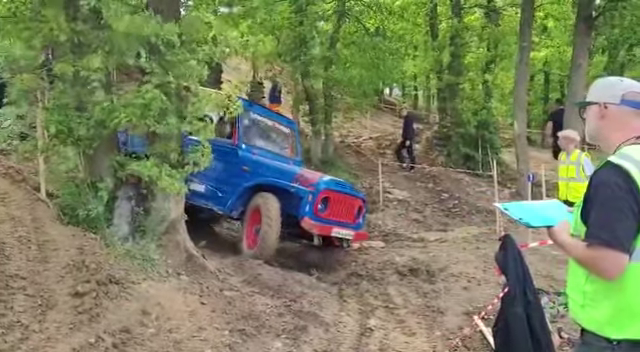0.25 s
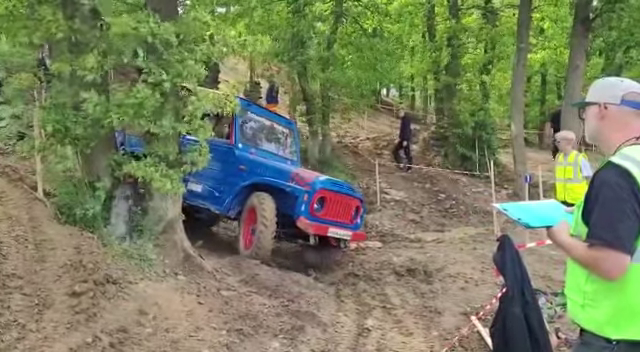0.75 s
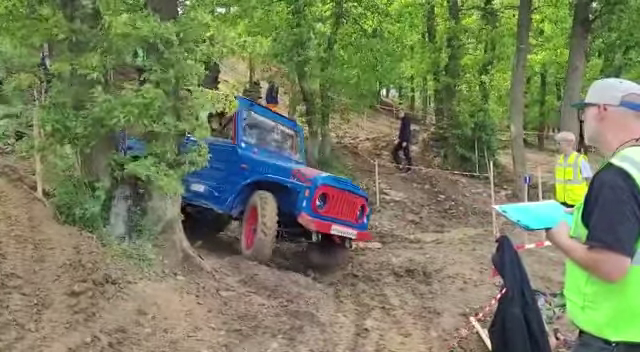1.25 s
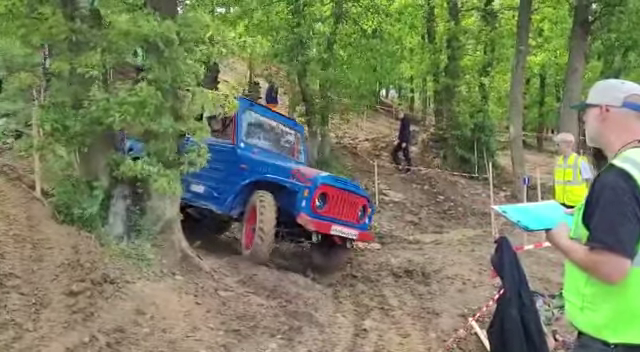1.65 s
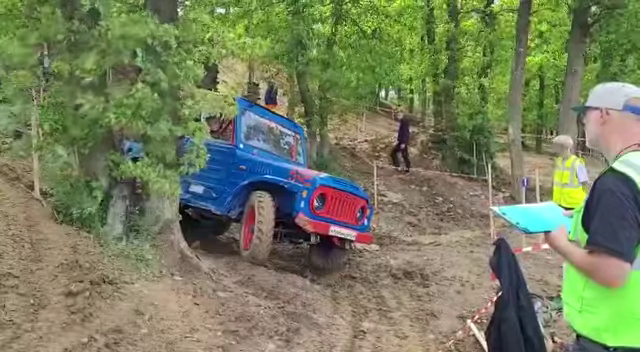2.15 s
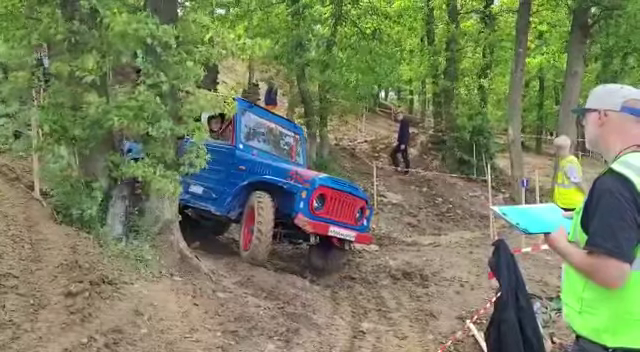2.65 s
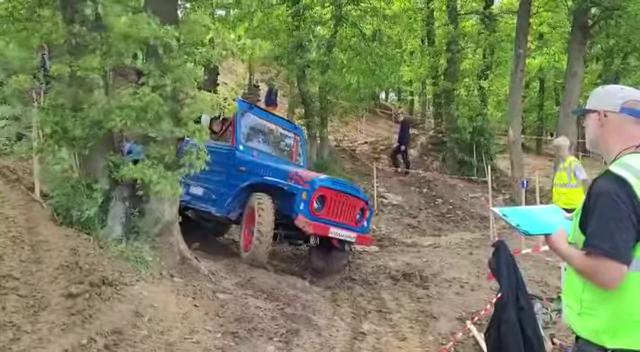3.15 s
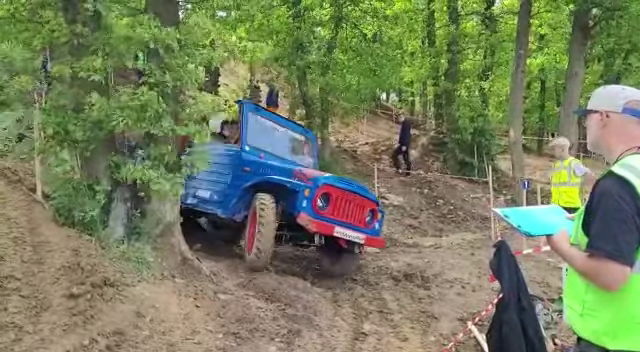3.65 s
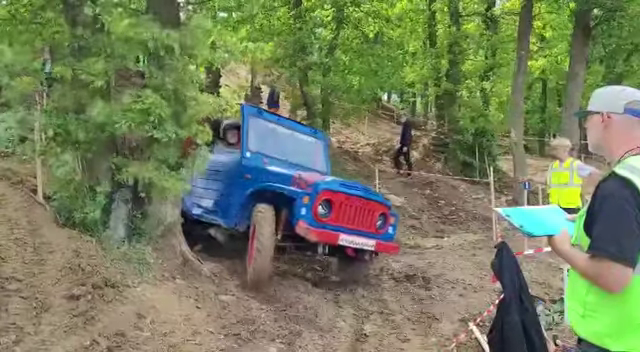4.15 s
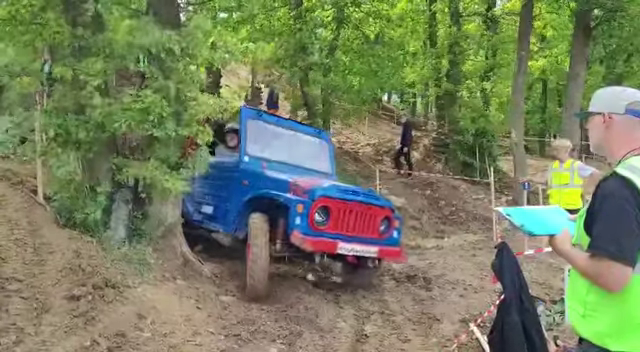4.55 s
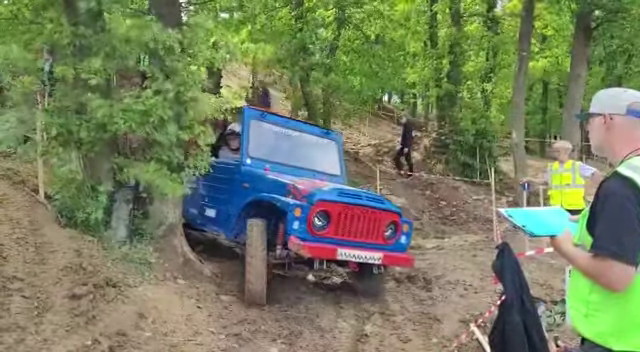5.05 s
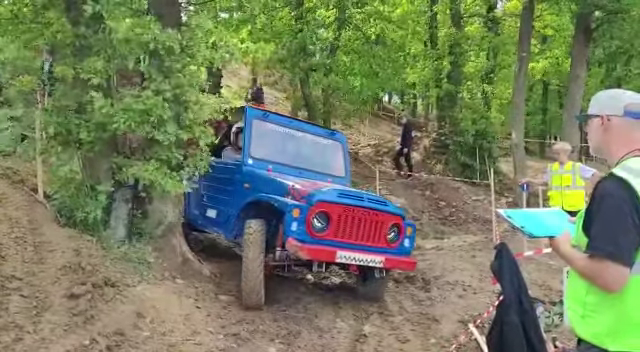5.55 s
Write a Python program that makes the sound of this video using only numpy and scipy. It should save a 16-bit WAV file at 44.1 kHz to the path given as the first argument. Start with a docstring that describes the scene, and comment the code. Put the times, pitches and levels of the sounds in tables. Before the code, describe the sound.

Outdoors in a wood, a few metres from a stereo microphone, a small four-cylinder engine growls on brief throttle stabs, with boomy exhaust and spitting hiss. The revs sag between stabs into clatter, fan air and rattling panels. A tiny chirp comes midway, and distant engines drone.

```python
"""A small four-cylinder off-roader crawls over a dirt bank in a wood, a few metres from a stereo microphone.
On short stabs of the throttle its exhaust booms in low harmonics of the firing rate, barks as each firing
kicks a pipe resonance, and spits shaped noise as hiss; between stabs the revs run down.
Clatter, fan air and rumble are coloured noise, and loose panels ring with random taps. Grit crackles under
the tyres, a spring bush chirps once, the trees echo the bark, and other engines drone farther off as tones."""
import sys
import numpy as np
from scipy import signal
from scipy.fft import rfft, irfft, next_fast_len
from scipy.io import wavfile
from scipy.ndimage import uniform_filter1d, map_coordinates

SR = 44100
rng = np.random.default_rng(int(sys.argv[2]) if len(sys.argv) > 2 else 0)


def put_to_file(sound):
    """Save the sound as 16-bit audio at rate SR, in the file named by the first command-line argument."""
    columns = np.atleast_2d(sound).T  # one column per channel
    safe = np.clip(columns, -1, 1)
    whole_steps = np.round(safe * 32767)
    wavfile.write(sys.argv[1], SR, whole_steps.astype(np.int16))


N = 255780


def amp(db):
    """Decibels to gain."""
    return 10 ** (np.asarray(db) / 20)


def unit(x):
    """Scale to rms 1."""
    return x / np.sqrt(np.mean(x ** 2) + 1e-20)


def along(points, hz):
    """Read (Hz, value) points on a log frequency axis."""
    f, v = np.transpose(points)
    return np.interp(np.log(hz + 1), np.log(f + 1), v)


def curves(rows):
    """One value per sample for each column after the time."""
    s, *cols = np.transpose(rows)
    t = np.arange(N) / SR
    return [np.interp(t, s, c) for c in cols]


def wobble(rate):
    """A smooth random curve through rate knots a second."""
    knots = rng.standard_normal(N // 40)
    return map_coordinates(knots, [np.arange(N) * rate / SR], mode="wrap")


def filtered(x, response):
    """Pass x through a complex response of frequency."""
    m = next_fast_len(N + SR // 2)
    spectrum = rfft(x, m) * response(np.fft.rfftfreq(m, 1 / SR))
    return irfft(spectrum, m)[..., :N]


def resonances(modes):
    """Causal response of (Hz, width Hz, dB) modes, summed with alternating sign."""
    def response(f):
        total = 0
        for k, (centre, width, db) in enumerate(modes):
            mode = 1j * f * width / (centre * centre - f * f + 1j * f * width)
            total = total + (-1) ** k * amp(db) * mode
        return total
    return response


# how alike the two microphone channels are: pitch_hz, likeness (1 same, 0 unrelated, negative opposed)
LIKENESS = [(25, 0.7), (70, 0.51), (500, 0.92), (1000, 0.71), (2000, 0.57), (4000, 0.3), (8000, 0.16),
            (14000, -0.25)]


def spread(pair):
    """Two unrelated signals become left and right: most alike near 500 Hz, apart in the treble."""
    def mid_side(hz):
        turn = np.arccos(np.clip(along(LIKENESS, hz), -1, 1)) / 2
        return np.array([np.cos(turn), np.sin(turn)])
    mid, side = filtered(pair, mid_side)
    return unit(np.array([mid + side, mid - side]))


def rush(spectrum, gate=1):
    """Turbulent stereo noise of rms 1, chopped by a gate and then coloured."""
    chopped = gate * rng.standard_normal((2, N))
    return spread(filtered(chopped, lambda hz: amp(along(spectrum, hz))))


def puffs(cycles, decay, scatter_db):
    """An envelope that jumps once a cycle to a new height and dies away within it (decay in cycles)."""
    sizes = amp(scatter_db * rng.standard_normal(N // 100))
    return unit(sizes[cycles.astype(int)] * np.exp(-(cycles % 1) / decay))


# stabs of the throttle: start_s, length_s, climb_s, pulling_hz, flare_hz, flare_length_s, settling_hz,
# first_spit_s, then relative boom_db, overtone_db, bark_db, hiss_db
THROTTLE_STABS = [(-.045, 0.29, .11, 83.55, 103.9, .2, 86.93, .029, -17, -23, -27, -50),
                  (.73, 0.058, 0.0504, 84.45, 87.21, 0.02005, 87.23, .77, -45, -41, -57, -70),
                  (.874, .255, .07, 103.1, 102.9, .08, 84.32, .908, -12.5, -19, -24.5, -48.5),
                  (2.76, 0.13, 0.097, 72.77, 76.2, 0.058, 74.92, 2.808, -20.5, -30.5, -38.5, -58.5),
                  (3.168, .32, .118, 87.16, 94.5, .08, 75.65, 3.194, -14.5, -19.5, -22, -50),
                  (3.94, 0.12, 0.099, 86.3, 90.7, 0.053, 82.24, 3.96, -25.5, -33.5, -35.5, -55.5)]
OVERRUN_S = .052  # the revs peak just after the throttle shuts
WHEEL_HZ, DRAG_S = 80.84, .23  # the slipping clutch drags the firing rate toward that of the wheels
RUN_DOWN_HZ_PER_S, SETTLE_HZ_PER_S = 64, 12.2  # off the throttle the revs fall fast, then slowly
FLYWHEEL_S = 0.045  # the flywheel rounds off every change of speed
HUNT_HZ, HUNTS_PER_S = .5, 12  # the speed is never quite steady


def revs():
    """Firing rate: a stab lifts it, the clutch drags on it, it flares as the clutch opens, then runs down."""
    t = np.arange(N) / SR
    hz = np.full(N, float(THROTTLE_STABS[0][3]))
    for start, length, climb_s, pull_hz, flare_hz, flare_s, settle_hz, *_ in THROTTLE_STABS:
        grip, peak = start + climb_s, start + length + OVERRUN_S
        free = max(peak - flare_s, grip)
        dragged_hz = WHEEL_HZ + (pull_hz - WHEEL_HZ) * np.exp((grip - free) / DRAG_S)
        start_hz = np.interp(start, t, hz)
        driven = np.interp(t, [start, grip, free, peak], [start_hz, pull_hz, dragged_hz, flare_hz])
        run_down = flare_hz - RUN_DOWN_HZ_PER_S * (t - peak)
        settling = settle_hz - SETTLE_HZ_PER_S * (t - peak)
        hz = np.select([t < start, t < peak], [hz, driven], np.maximum(run_down, settling))
    return uniform_filter1d(hz, int(FLYWHEEL_S * SR)) + HUNT_HZ * wobble(HUNTS_PER_S)


FADE_DB_PER_S, LINGER_S = 12.5, 0.18  # a held stab fades; a little of it may linger on the overrun


def throttle(part, attack_s, release_s, lead_s=0, early_s=0, snap_db=-120, linger_db=-120):
    """Gain the stabs give a part: attack, fading hold, release, perhaps a snap and a lingering tail."""
    t, gain = np.arange(N) / SR, np.zeros(N)
    for start, length, *_, boom_db, overtone_db, bark_db, hiss_db in THROTTLE_STABS:
        db = dict(boom=boom_db, overtones=overtone_db, bark=bark_db, hiss=hiss_db)[part]
        age = t - start
        shut = np.maximum(age - length + early_s, 0)
        opening = np.sin(np.pi / 2 * np.clip((age + lead_s) / attack_s, 0, 1)) ** 2
        tail = amp(linger_db) * np.exp(-shut / LINGER_S)
        closing = np.maximum(np.exp(-shut / release_s), tail)
        snap = amp(snap_db) * np.exp(-np.abs(age - length) / 0.059)  # as the throttle shuts
        fading = amp(db - FADE_DB_PER_S * np.clip(age, 0, length))
        gain += fading * (opening * closing + snap)
    return gain


# the grille swings toward the microphone: time_s, front_gain_db (each part takes its own share)
FACING_GAIN = [(0, 1.5), (2.4, -0.5), (3.8, 4), (4.4, 3), (5.35, 9.5), (5.8, 9)]
CRUISE_HZ = 80  # reference firing rate


def running(law, hz):
    """Gain of a part off the throttle: it follows the revs and the turn of the front."""
    db, db_per_octave, front_share = law
    octaves = np.log2(hz / CRUISE_HZ)
    return amp(db + db_per_octave * octaves + front_share * curves(FACING_GAIN)[0])


BARK_LEAD = .5  # the bark comes this many firings before the spit


def cylinder_count(firings):
    """Firings counted from the first spit of the latest stab: every fourth spits, just after its bark."""
    t, count = np.arange(N) / SR, firings
    for start, *_, first_spit, boom_db, overtone_db, bark_db, hiss_db in THROTTLE_STABS:
        first = np.round(np.interp(first_spit, t, firings) - BARK_LEAD) % len(CYLINDER_STRENGTHS)
        recount = firings - first - BARK_LEAD + 2 * len(CYLINDER_STRENGTHS)
        count = np.where(t > start - OVERRUN_S, recount, count)
    return count


# brief dips of the coasting boom: time_s, depth_db
BOOM_DIPS = [(.27, -4), (1.48, -7), (2.34, -6), (3.03, -4), (3.85, -7), (4.26, -13), (4.72, -6),
             (4.86, -10)]
FALTER_S = .026


def faltering():
    """Gain of the brief dips in the coasting boom, which the body rumble shares."""
    t = np.arange(N) / SR
    return amp(sum(db * np.exp(-((t - s) / FALTER_S) ** 2) for s, db in BOOM_DIPS))


# the boom off the throttle: time_s, level_db
COASTING_BOOM = [(0, -29), (.36, -22), (.52, -21.5), (.8, -30.5), (1.17, -29), (1.29, -18), (1.41, -24),
                 (1.62, -38), (2, -30.5), (2.3, -32), (2.49, -24.5), (2.85, -28), (3.03, -32.5),
                 (3.13, -24), (3.68, -24.5), (3.9, -27.5), (4.15, -30), (4.45, -33), (4.72, -27.5),
                 (5, -31), (5.55, -24), (5.8, -25)]
# what the silencer lets through: pitch_hz, gain_db
SILENCER_GAIN = [(125, -14), (145, 1), (172, 1), (205, -12), (230, -4.5), (260, -3), (300, -11),
                 (345, -26.5), (400, -17.5), (435, -23), (520, -30)]
# overtones off the throttle: level_db at the reference rate, db_per_octave of revs, front_share
OVERTONE_LAW = (-39.5, 8, 0.25)
COAST_SECOND_DB = -5.5  # off the throttle the pulses round off and the second order weakens
LOPE, CHUG = .17, .2  # unevenness once a turn, and once in four firings


def boom(hz, firings, load):
    """The low orders of the exhaust pass the silencer: steadier under load, a little lumpy when coasting."""
    coasting_first = amp(curves(COASTING_BOOM)[0]) * faltering()
    driven_first = throttle("boom", attack_s=0.075, release_s=0.047, lead_s=0.0023, early_s=0.036,
                            linger_db=-8.5)
    first = np.hypot(coasting_first, driven_first)
    coasting = running(OVERTONE_LAW, hz)
    driven = throttle("overtones", attack_s=0.076, release_s=0.046, lead_s=0.018, early_s=0.03,
                      linger_db=-9)
    uneven = LOPE * np.cos(np.pi * firings) + CHUG * np.cos(np.pi * firings / 2)
    lope = 1 + (1 - .7 * load) * uneven

    def lumps():
        return lope * amp((1.3 - .75 * load) * wobble(20))

    tone = first * lumps() * np.cos(2 * np.pi * firings)
    for k in range(2, 6):
        overtone = np.hypot(coasting * amp(COAST_SECOND_DB * (k == 2)), driven)
        passed = overtone * amp(along(SILENCER_GAIN, k * hz))
        tone += passed * lumps() * np.cos(2 * np.pi * k * firings)
    return np.sqrt(2) * tone


# tailpipe resonances: pitch_hz, width_hz, relative_db
PIPE_MODES = [(512, 30, -6), (602, 46, -1), (645, 52, 2), (692, 60, -3), (805, 70, -11)]
# broad resonance of the chamber before the pipe: pitch_hz, width_hz, relative_db
CHAMBER_MODE = [(635, 150, 0)]
ROUND_TRIP_S, RETURN_SHARE = .0096, .35


def tailpipe(x):
    """Sound passes the chamber and rings in the pipe; part runs back up the exhaust and returns."""
    def response(hz):
        returned = 1 + RETURN_SHARE * np.exp(-2j * np.pi * hz * ROUND_TRIP_S)
        return resonances(PIPE_MODES)(hz) * resonances(CHAMBER_MODE)(hz) * returned
    return filtered(x, response)


# the four cylinders, two far harder, one of them in every turn: relative strength_db
CYLINDER_STRENGTHS = [13, 2, 12, 1]
# upper tailpipe modes that rasp under load: pitch_hz, width_hz, relative_db
RASP_MODES = [(1324, 78, 12.5), (2380, 210, 1), (5070, 140, -3.5)]
# bark off the throttle: level_db at the reference rate, db_per_octave of revs, front_share
BARK_LAW = (-57, 0.99, 0.54)
RASP_DB, RASP_DB_PER_OCTAVE = -22.5, 28  # relative to the bark under throttle, at the reference rate


def bark(hz, firings):
    """Firings kick chamber and pipe; strong and weak alternate, so it growls an octave under the boom."""
    count = cylinder_count(firings) + BARK_LEAD
    at = np.flatnonzero(np.diff(np.floor(count))) + 1
    chance = rng.standard_normal((len(at), 2))  # timing and strength of each firing
    late = np.round(.00003 * SR * chance[:, 0]).astype(int)
    strength_db = np.take(CYLINDER_STRENGTHS, count[at].astype(int), mode="wrap")
    kicks = np.zeros(N)
    kicks[np.clip(at + late, 0, N - 1)] = amp(strength_db + chance[:, 1])
    gas = unit(kicks) + .1 * rng.standard_normal(N)
    pipe = unit(tailpipe(gas))
    rasp_puffs = puffs(count, decay=.3, scatter_db=1.2) * rng.standard_normal(N)
    rasp = unit(filtered(rasp_puffs, resonances(RASP_MODES)))
    drive = throttle("bark", attack_s=0.12, release_s=0.004, lead_s=0.053)
    swell = throttle("bark", attack_s=0.12, release_s=0.0083)
    rasping = amp(RASP_DB + RASP_DB_PER_OCTAVE * np.log2(hz / CRUISE_HZ))  # grows with the revs
    return np.hypot(running(BARK_LAW, hz), drive) * pipe + rasping * swell * rasp


# colour of the escaping gas: pitch_hz, relative_db
HISS_COLOUR = [(900, -40), (1500, -5), (2500, 0), (3400, 7.5), (4100, -1), (4950, 10), (5500, 0), (6300, 6),
               (7700, 4.5), (8800, -5.5), (10500, 2.5), (12600, 6.5), (15700, 4)]
# hiss off the throttle: relative_db at the reference rate, db_per_octave of revs, front_share
HISS_LAW = (-63, 4.1, 0.41)
SPIT_RISE_S, SPIT_DECAY_S, SPIT_DB = .003, .010, 7.5  # size relative to the throttled flow


def hiss(hz, firings):
    """Gas hisses out with the firings; under throttle one cylinder spits sharply, every fourth firing."""
    count = cylinder_count(firings)
    cycles = count / len(CYLINDER_STRENGTHS)
    age = cycles % 1 * len(CYLINDER_STRENGTHS) / hz  # seconds since the spit began
    sizes = amp(SPIT_DB + 1.5 * rng.standard_normal(N // 100))[cycles.astype(int)]
    rise = np.minimum(age / SPIT_RISE_S, 1)
    spit = sizes * rise * np.exp(-np.maximum(age - SPIT_RISE_S, 0) / SPIT_DECAY_S)
    flow = throttle("hiss", attack_s=0.085, release_s=0.034, lead_s=0.022, early_s=.003, snap_db=-12)
    chop = (.62 + .35 * puffs(count, decay=.45, scatter_db=1.8)) * amp(1.1 * wobble(42))
    level = np.hypot(running(HISS_LAW, hz), flow * np.hypot(1, spit))
    return amp(6.0) * level * rush(HISS_COLOUR, chop)


# the hardest firings pop out of the pipe: start_s, hiss_db, bark_db
PIPE_POPS = [(.031, -42, -34), (.943, -32.5, -16), (1.029, -40, -32), (3.194, -40, -34), (3.964, -45, -38),
             (4.009, -39.5, -33)]
POP_RISE_S, POP_DECAY_S = .002, .006


def pops():
    """A hard firing spits a crisp puff of gas and rings the pipe."""
    t, puff, thud = np.arange(N) / SR, np.zeros(N), np.zeros(N)
    ring = tailpipe(signal.unit_impulse(N))
    for s, hiss_db, bark_db in PIPE_POPS:
        age = np.maximum(t - s, 0)
        rise = np.minimum(age / POP_RISE_S, 1)
        puff += amp(hiss_db) * rise * np.exp(-np.maximum(age - POP_RISE_S, 0) / POP_DECAY_S)
        thud += amp(bark_db) * np.interp(t - s, t, ring, left=0) / np.abs(ring).max()
    return puff * rush(HISS_COLOUR) + thud


# roar off the throttle: level_db at the reference rate, db_per_octave of revs, front_share
ROAR_LAW = (-49.5, 20, -0.45)


def roar(hz, firings):
    """Gas churns in the silencer with every firing, most at high revs and as the throttle opens."""
    # pitch_hz, relative_db
    colour = [(130, -32), (200, 0.5), (280, -3.0), (340, -12.5), (410, -4), (480, -7), (700, -34.5)]
    gulp = amp(-14) * throttle("overtones", attack_s=0.062, release_s=0.15, lead_s=.03, early_s=.12)
    churn = rush(colour, puffs(firings, decay=0.79, scatter_db=3.0))
    return np.hypot(running(ROAR_LAW, hz), gulp) * churn


# colour of the rumble: pitch_hz, relative_db
RUMBLE_COLOUR = [(15, -12), (28, -17), (45, 1.5), (70, 5), (130, 3.5), (180, -7.5), (270, -6.5), (340, -19),
                 (500, -17), (900, -47.5)]
# rumble off the throttle: relative_db at the reference rate, db_per_octave of revs, front_share
RUMBLE_LAW = (-39.5, 4, 0.45)


def rumble(hz):
    """Turbulent exhaust flow and the shaking body, as low noise."""
    surge = amp(-23) * throttle("boom", attack_s=.04, release_s=.08)
    level = np.hypot(running(RUMBLE_LAW, hz) * faltering(), surge)
    return amp(9.0) * level * rush(RUMBLE_COLOUR)


# colour of the clatter: pitch_hz, relative_db
CLATTER_COLOUR = [(180, -43), (320, -11), (428, -9.5), (538, 0), (700, -1.5), (860, -7), (977, -8.5),
                  (1240, -12), (1400, -13), (2400, -18.5), (3280, -23), (4200, -33), (7000, -53),
                  (12000, -74)]
# ringing of the valve gear: pitch_hz, width_hz, relative_db
VALVE_MODES = [(4670, 330, 1.5), (6130, 600, 2), (7620, 520, -10)]
# clatter off the throttle: relative_db at the reference rate, db_per_octave of revs, front_share
CLATTER_LAW = (-41, 7.9, 0.53)
# valves: level_db at the reference rate, db_per_octave of revs, front_share
VALVE_LAW = (-56, 10, 0.45)


def engine_bay(hz, firings):
    """Clatter beats with the crank, gears and chain repeat every turn, valves tick; stabs add strain."""
    turns = firings / 2

    def knock():
        each_turn = puffs(turns, decay=.35, scatter_db=2.5)
        return each_turn + puffs(firings, decay=.3, scatter_db=2.5)

    unsteady = amp(1.2 * wobble(34) + .7 * wobble(7))
    clatter = rush(CLATTER_COLOUR, (1 + .35 * knock()) * unsteady)
    one_turn = rng.standard_normal(size=512)
    repeated = map_coordinates(one_turn, [turns % 1 * len(one_turn)], mode="wrap")
    whirr = .62 * unit(filtered(repeated, lambda f: amp(along(CLATTER_COLOUR, f))))
    ticks = (1 + 0.23 * knock()) * amp(wobble(36)) * rng.standard_normal((2, N))
    valves = spread(filtered(ticks, resonances(VALVE_MODES)))
    strain = amp(-21.0) * throttle("boom", attack_s=0.21, release_s=0.037)
    level = amp(2.5) * np.hypot(running(CLATTER_LAW, hz), strain)
    return level * (clatter + whirr) + running(VALVE_LAW, hz) * valves


# air through the radiator: pitch_hz, relative_db
FAN_COLOUR = [(200, -2.5), (340, 4), (430, -2), (560, 3), (700, -17), (1000, 5.5), (1230, 6), (1450, 0),
              (2400, -5), (3300, -12.5), (4200, -18), (9000, -43)]
# fan air: level_db at the reference rate, db_per_octave of revs, front_share
FAN_LAW = (-46.5, 11.7, 1.1)


def fan(hz):
    """The radiator fan pushes a fluttering stream of air through the grille."""
    flutter = amp(1.4 * wobble(28) + .8 * wobble(7))
    return running(FAN_LAW, hz) * rush(FAN_COLOUR, flutter)


# loose panels and fittings: pitch_hz, width_hz, relative_db
LOOSE_PANELS = [(431, 61, 2), (534, 12, 6), (936, 10, 5.5), (1200, 32, 0), (1767, 48, 0), (2470, 81, -5.5)]
# rattle: level_db at the reference rate, db_per_octave of revs, front_share
RATTLE_LAW = (-49.5, 0.68, 1.06)
RATTLES_PER_S = 130  # mean, for each panel and channel


def rattle(hz):
    """Each loose panel rings with dense, random taps."""
    rings = 0
    for panel in LOOSE_PANELS:
        taps = (rng.random((2, N)) < RATTLES_PER_S / SR) * rng.uniform(-1.1, 1, (2, N))
        rings = rings + amp(panel[2]) * unit(filtered(taps, resonances([panel])))
    return running(RATTLE_LAW, hz) * spread(rings)


def squeak(s, hz, db, length):
    """A dry spring bush chirps as the axle twists: a short, unsteady tone."""
    t = np.arange(N) / SR
    swell = np.exp(-((t - s) / length) ** 2)
    return amp(db) * swell * np.sin(2 * np.pi * hz * t + 0.23 * wobble(51))


def grit():
    """Small stones and twigs snap under the tyres: random bursts of noise, about 22 a second."""
    sizes = amp(2.5 * np.minimum(rng.exponential(size=N), 2))
    snaps = (rng.random(N) < 22 / SR) * sizes
    life = np.exp(-np.arange(SR // 50) / SR / .0022)
    colour = [(800, -30), (1800, 9), (4000, 2), (7000, -2), (15000, -4)]  # pitch_hz, relative_db
    return amp(-66) * rush(colour, signal.fftconvolve(snaps, life)[:N])


def trees(x, t60):
    """Trunks scatter a short, thin echo: decaying noise that starts after 8 ms."""
    t = np.arange(SR // 2) / SR
    tail = rng.standard_normal((2, len(t))) * amp(-60 * t / t60) * (t > .008)
    return signal.fftconvolve(x[None], tail / np.linalg.norm(tail[0]), axes=1)[:, :N]


# another engine among the trees: time_s, firing pitch_hz, mean level_db
SECOND_ENGINE = [(0, 105.5, -48), (.45, 110.5, -23), (.85, 117, -24.5), (1.4, 133, -27.5), (1.8, 116, -43),
                 (2.33, 100, -51), (2.5, 104, -28), (2.7, 110.2, -23), (3.3, 110, -30), (3.6, 117, -31.5),
                 (4.25, 117, -54), (4.7, 114, -41.5), (5.1, 111, -32), (5.8, 110.5, -36.5)]
# a third engine swells briefly: time_s, firing pitch_hz, mean level_db
THIRD_ENGINE = [(.2, 52.6, -48), (.55, 57.9, -24), (.85, 71.3, -40), (1.3, 73.3, -72)]


def far_engine(track):
    """Another vehicle among the trees: little but its firing note carries."""
    hz, db = curves(track)
    phase = 2 * np.pi * (np.cumsum(hz) / SR + .015 * wobble(12))
    return amp(db + wobble(7.16)) * (np.cos(phase) + amp(-36) * np.cos(2 * phase))


def scene():
    """Firing rate and throttle drive the near engine's parts; wheels and far engines join them."""
    hz = revs()
    firings = .5 + np.cumsum(hz) / SR
    pull = throttle("bark", attack_s=0.11, release_s=0.015)
    load = np.clip(amp(42) * pull, 0, 1)  # 0 coasting, 1 full load
    pipe = bark(hz, firings)
    echo = amp(-14) * trees(pipe, t60=.35)
    exhaust = boom(hz, firings, load) + pipe + echo + hiss(hz, firings) + pops()
    exhaust = exhaust + roar(hz, firings) + rumble(hz)
    body = engine_bay(hz, firings) + fan(hz) + rattle(hz)
    wheels = grit() + squeak(s=3.397, hz=1110, db=-32.5, length=0.018)
    return exhaust + body + wheels + far_engine(SECOND_ENGINE) + far_engine(THIRD_ENGINE)


# colour of the two microphone ports: pitch_hz, left_minus_right_db
PORT_LEAN = [(25, -3), (70, 0.5), (250, -0.8), (550, -0.8), (1000, -3), (2400, -0.5), (6000, 1), (15000, 0)]
TOP_HZ = 15780  # band limit


def record(dry):
    """The two microphone ports differ slightly in colour; nothing passes above the band limit."""
    def ports(hz):
        lean_db = along(PORT_LEAN, hz)
        return amp(np.array([lean_db, -lean_db]) / 2) * (hz < TOP_HZ)
    return filtered(dry, ports)


dry = scene()
out = record(dry)
put_to_file(out)
```